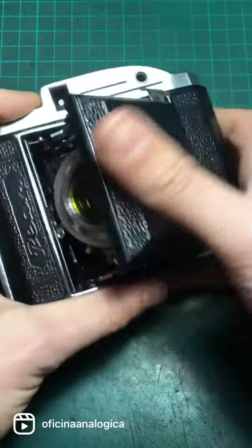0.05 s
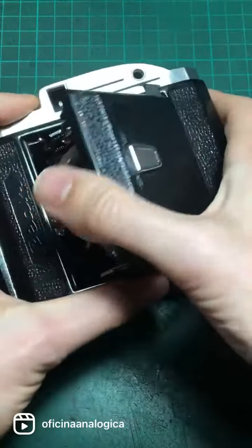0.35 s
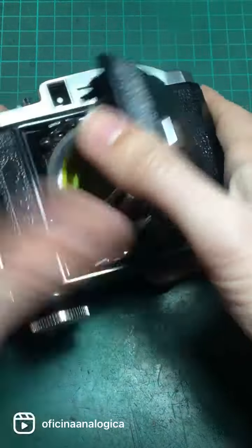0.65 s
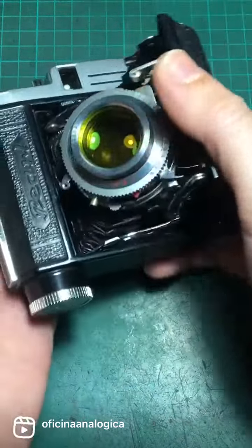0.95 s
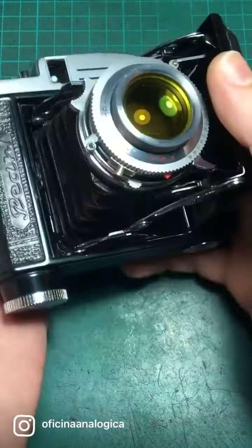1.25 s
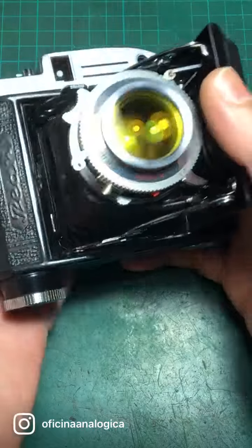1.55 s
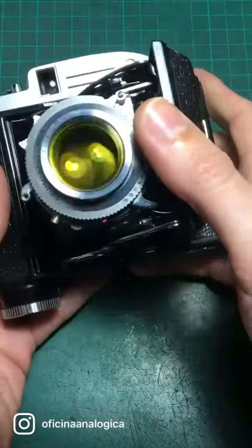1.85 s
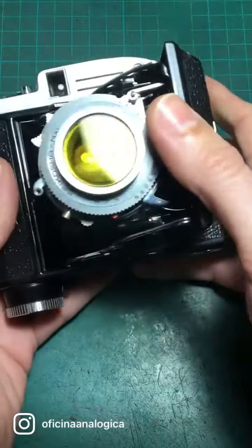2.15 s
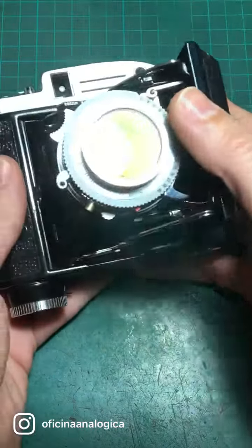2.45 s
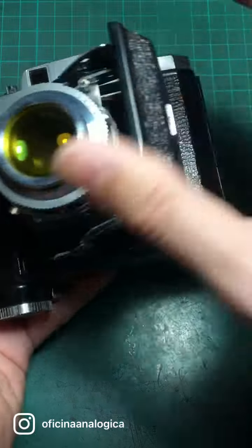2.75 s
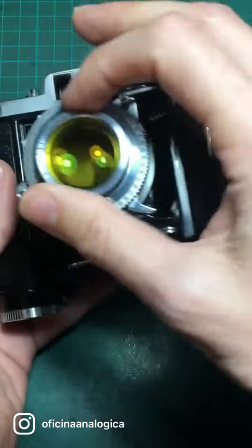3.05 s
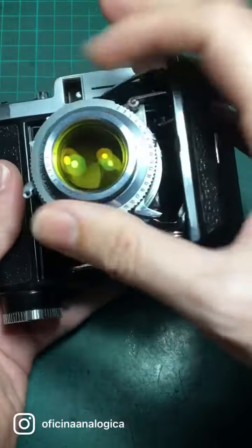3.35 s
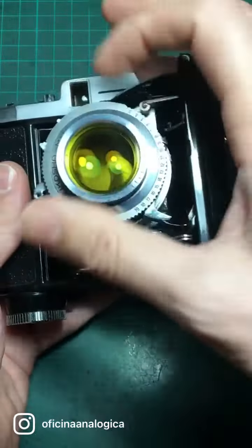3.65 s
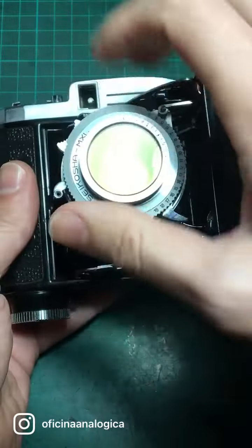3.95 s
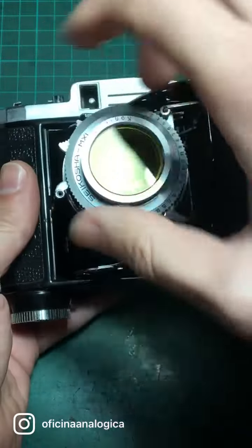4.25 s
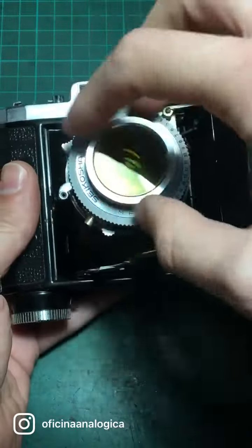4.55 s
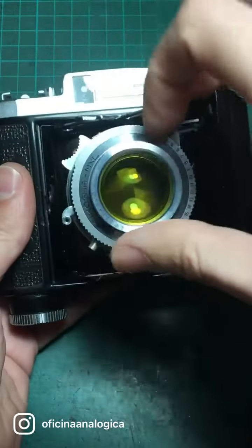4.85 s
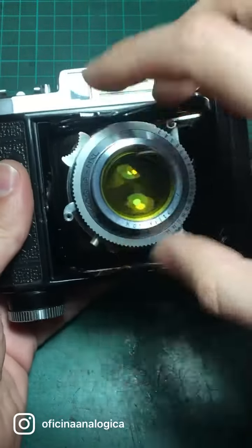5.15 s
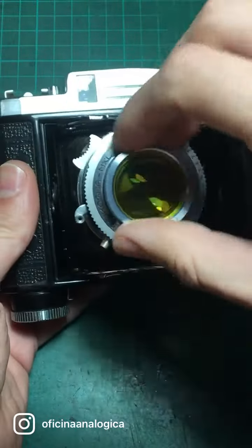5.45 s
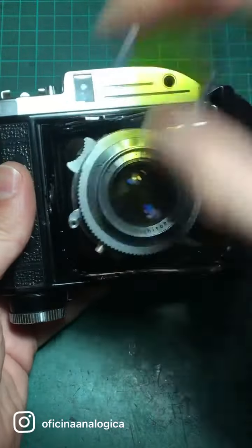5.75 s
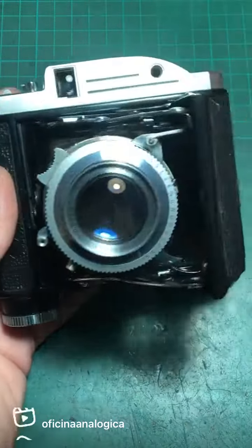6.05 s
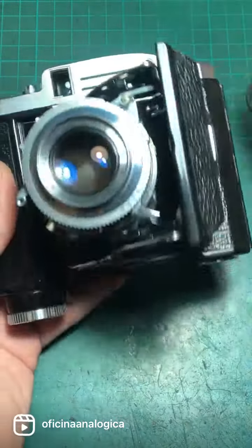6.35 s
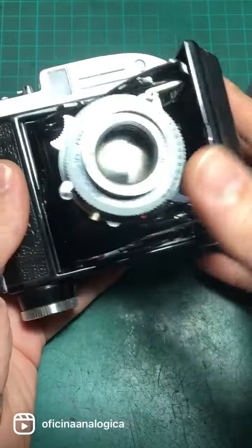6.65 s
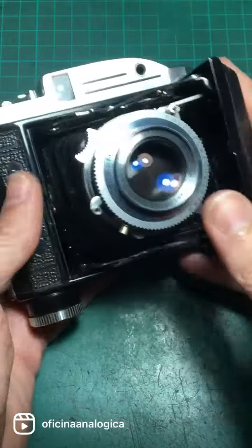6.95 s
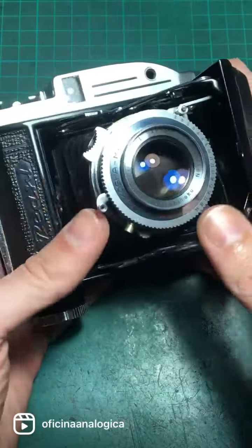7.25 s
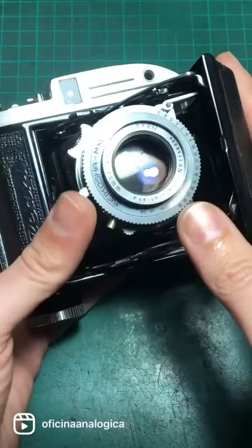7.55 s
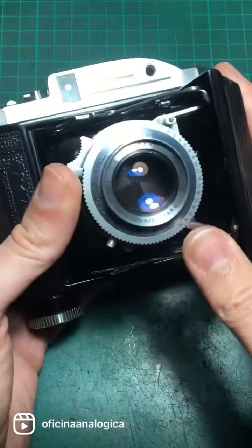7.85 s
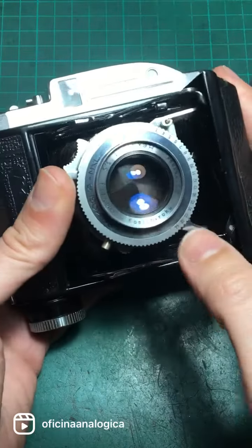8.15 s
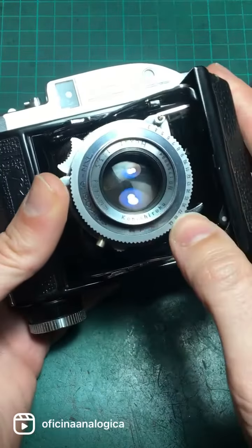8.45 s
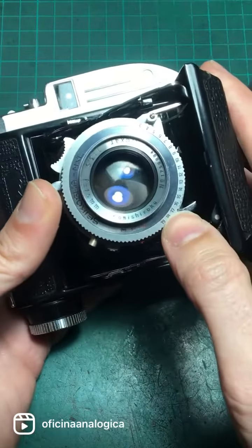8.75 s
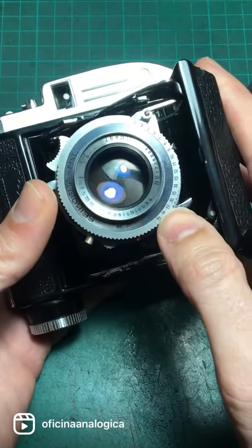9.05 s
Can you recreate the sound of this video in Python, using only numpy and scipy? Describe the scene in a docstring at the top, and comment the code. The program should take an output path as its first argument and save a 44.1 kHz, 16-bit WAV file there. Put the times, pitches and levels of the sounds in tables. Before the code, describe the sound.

Close metal clicks and one loud springy snap from a folding camera, followed by a filter scraping loose and clattering briefly on a workbench.

```python
"""A workbench in a small quiet room, where a folding camera is handled close by.
The door catch lets go, the struts snap open with a thump and their springs ring on.
A filter is unscrewed from the lens and put down, where it wobbles to rest; then shutter levers are nudged.
Knocks are short noise bursts and rubs are trains of tiny slips, each ringing through its part."""
import sys
import numpy as np
from scipy import signal
from scipy.fft import rfft, irfft
from scipy.io import wavfile

SR = 44100
rng = np.random.default_rng(int(sys.argv[2]) if len(sys.argv) > 2 else 0)


def digitize_waveform(pressure):
    """Quantize a signal to 16-bit integers and store it at the path in sys.argv[1].

    Rows of a 2-D input are taken as channels; values are limited to [-1, 1].
    """
    field = np.atleast_2d(pressure).T
    bounded = np.clip(field, -1, 1)
    quanta = np.round(bounded * 32767).astype(np.int16)
    wavfile.write(sys.argv[1], SR, quanta)


N = 401744
TAPS = 4096
CATCH_S, SNAP_S = .3833, 1.0603  # catch lets go, door hits its stop
BLOW_S = .01  # nominal blow length
STRIKE, SOFT_STRIKE = .45, .25  # clean first impact, relative to the rattle
FINGER_ECHO_GAIN = .5

# Row formats for all tables:
# Hits. Each row: time in seconds, level in dB.
# Strokes. Each row: start and end in seconds, level in dB, tilt in dB/octave, swell in dB.
# Shape, a part's broad spectrum. Each row: frequency in Hz, level in dB.
# Peaks, its resonances. Each row: centre in Hz, width in Hz, gain in dB.
LEVER_SHAPE = [(400, -32), (1500, -18), (4000, -13), (6500, -7.5), (8000, -7.5), (10000, -9.5),
               (14500, -7.5), (16000, -16)]
LEVER_PEAKS = [(6200, 200, 1.9), (8000, 1000, 8), (11700, 900, 4), (14000, 760, 2)]


def struts():
    """The struts unfold and lock in a quick run of blows."""
    # Each row: time in seconds, level in dB, tilt in dB/octave, rattle t60 in seconds.
    locks = [(1.009, -50, -3.5, 0.048), (1.038, -56, -4, .04), (1.0563, -21, 1.5, 0.031),
             (1.0597, -18, 0, 0.0097), (1.064, -20.5, 1.66, 0.025)]
    shape = [(200, -14), (310, -9.5), (400, -22), (490, -33), (650, -8), (1180, -5.5), (1600, -7.5),
             (2000, -6), (3000, -9), (4300, -9), (5400, -11), (8800, -9), (9800, -19.5), (11500, -13.5),
             (13000, -14.5), (16000, -22.5)]
    peaks = [(1200, 150, 4.6), (1520, 60, 1.8), (1850, 120, 6), (2728, 90, 9.5), (3410, 90, 11),
             (3900, 220, 5.1), (4500, 140, 7.3), (6134, 80, 5.5), (6500, 80, 3.5), (7130, 69, 4.4),
             (7364, 54, 3.5), (8860, 500, 5)]
    return blows(locks, shape, peaks, first=SOFT_STRIKE, rise_s=.00037, after_db=-22, after_t60_s=.14)


def door_thump(level_db=-9, low_hz=50, sweep_hz=370, settle_s=.0036, rise_s=.0027, t60_s=.066):
    """The door stops dead: a low knock whose pitch drops as the body takes up the blow."""
    out, t = np.zeros(N), np.arange(2 * TAPS) / SR
    cycles = np.cumsum(low_hz + sweep_hz * np.exp(-t / settle_s)) / SR
    envelope = amp(level_db - 60 * t / t60_s) * (1 - np.exp(-(t / rise_s) ** 2))
    add(out, SNAP_S, -envelope * np.sin(2 * np.pi * cycles))
    return out


def springs():
    """Thin springs and the shell ring on after the snap and the catch's release."""
    # Each row: frequency in Hz, level in dB, t60 in seconds.
    snap_modes = [(111, -47, 0.34), (210, -46, 0.46), (275.1, -43, 0.19), (315, -26.5, 0.027),
                  (942, -39.5, .9), (956, -52.5, 1.4), (1035, -53, 1.5), (1258, -47.5, 0.48),
                  (1884, -42, 0.86), (2080, -50, 0.39), (2342, -66, .8), (3554, -50, .35),
                  (3774, -61.5, .8), (4100, -51.5, .33), (5410, -74.5, 1), (5900, -71, 1.5),
                  (8619, -77, .9), (9390, -76.5, 1.2), (10480, -30, .07), (13431, -78, 1.1),
                  (14640, -28, .085)]
    catch_modes = [(1220, -64.5, 0.54), (2244, -63, 0.35), (3860, -69, 0.18), (5410, -72, .8),
                   (5852, -70, 0.93), (13431, -78, .8)]
    out, t = np.zeros(N), np.arange(2 * SR) / SR
    for jolt_s, modes in (SNAP_S, snap_modes), (CATCH_S, catch_modes):
        for hz, db, t60_s in modes:
            add(out, jolt_s, amp(db - 60 * t / t60_s) * np.sin(2 * np.pi * hz * t))
    return out


def door_catch():
    """The catch clicks and rebounds; the door drags past it."""
    hits = [(.2955, -62.5), (.3392, -41), (.3605, -43), (.3833, -36.5), (2.9368, -40)]
    strokes = [(.338, .368, -45, -6, -5)]
    shape = [(180, -24), (300, -45), (486, -3), (634, -15), (787, -6.5), (1360, -10.5), (2000, -5.5),
             (2610, -3.5), (4990, -4.5), (6850, 0), (8940, -12), (13100, -6), (16000, -18)]
    peaks = [(796, 62, 10.5), (2250, 500, 6), (3740, 280, 5), (4650, 170, 6), (6200, 280, 2),
             (6900, 250, 6), (13400, 500, -1)]
    rows = by_force(hits, tilt_db_oct=0, harden=.27, t60_s=.024, seat=.1)
    clicks = blows(rebounding(rows, delay_s=.004, weaker_db=10.5), shape, peaks,
                   after_db=-17, after_t60_s=.099, onset_db=-10, onset_t60_s=.012)
    return clicks + rubs(strokes, shape, peaks, slips_per_s=810, spread_db=2, hiss=.53)


def filter_knocks():
    """The filter knocks in its thread as it is gripped and let go."""
    hits = [(3.224, -65), (3.251, -63), (3.3495, -33.5), (3.3855, -52), (3.6315, -33.5), (3.669, -45.5),
            (3.7505, -43.5), (3.972, -57.5), (4.078, -62.5), (4.097, -58.5), (4.471, -62.5), (4.793, -62),
            (4.8312, -31.5), (4.983, -54.5), (5.0056, -50), (5.2922, -54), (5.462, -58.5)]
    shape = [(240, -35), (600, -22.5), (1300, -12), (2400, -7), (3100, -12), (4200, -7.5), (5500, -12.5),
             (7000, -8), (10100, -10.5), (11500, -7.5), (13000, -12.5), (15000, -15), (16000, -30)]
    peaks = [(1270, 440, 3.3), (1940, 42, 6.4), (2414, 180, 6.7), (3480, 400, 7), (4500, 430, 5.4),
             (6430, 620, 5.6), (8360, 540, 4.8), (11240, 280, 11.2), (11880, 520, 11.5)]
    rows = by_force(hits, tilt_db_oct=-3.5, harden=.23, t60_s=.024, seat=.55)
    return blows(rebounding(rows, delay_s=.0038, weaker_db=12), shape, peaks,
                 rise_s=.00058, after_db=-18, after_t60_s=.041, onset_db=-6, onset_t60_s=.006)


def filter_turns(grit_db=-7.5):
    """The turning filter rubs in its thread and cracks grains of grit."""
    strokes = [(3.12, 3.28, -72.5, 0, -1), (3.36, 3.51, -63.5, 1.5, -3), (3.636, 3.7, -49, 0.4, -3),
               (3.67, 3.765, -62, 0.5, -7), (3.985, 4.13, -67, 1, -1), (4.375, 4.53, -62, 0, -7),
               (4.835, 4.89, -62.5, -5.5, -18), (4.91, 5.0, -63, 1, 21), (5.31, 5.46, -70.5, -2.5, 6)]
    shape = [(300, -20), (1000, -7.5), (2000, -4.5), (3000, -6), (4400, 2), (5100, -9), (8000, -5),
             (9400, -7.5), (10500, -20), (11700, -4), (13200, -23), (16000, -22)]
    peaks = [(1920, 190, 4), (2440, 230, 3.3), (4280, 830, -2.5), (11980, 800, 8)]
    grit_shape = [(400, -23), (1300, 2), (2400, -3), (4400, 3), (5500, -11), (8000, -8), (16000, -20)]
    friction = rubs(strokes, shape, peaks, slips_per_s=800, spread_db=1, hiss=.59, echo=FINGER_ECHO_GAIN)
    grit = rubs(strokes, grit_shape, [], slips_per_s=90, spread_db=3, hiss=.15)
    return friction + amp(grit_db) * grit


def filter_falls(start_s=6.181, first_gap_s=.0467, speed_kept=.815):
    """Hits of the filter rocking on its uneven rim: each bounce loses speed, so the gaps shrink."""
    falls_db = [-39, -40.5, -43.5, -42, -44.5, -50.5, -51.5]  # one level per fall
    speed = speed_kept ** np.arange(len(falls_db))
    return list(zip(start_s + first_gap_s * (np.cumsum(speed) - speed), falls_db))


def filter_wobble(falls):
    """The rim touches the bench, then clacks at each fall."""
    touch_hits = [(6.0728, -49.5), (6.159, -51)]
    shape = [(240, -49), (400, -8), (496, -25), (579, -16), (1030, -7.5), (1220, -2.5), (1790, -7),
             (3530, -11.5), (4880, -26), (7170, -16.5), (10200, -30), (11200, -22), (16000, -37)]
    peaks = [(1223, 38, 4.9), (2100, 500, 2.4), (3540, 400, 5), (5540, 600, 7.4), (6800, 260, 3.2)]
    rows = by_force(touch_hits + falls, tilt_db_oct=-4, harden=.57, t60_s=.051, seat=.35)
    return blows(rows, shape, peaks, first=SOFT_STRIKE, rise_s=.00057,
                 after_db=-27, after_t60_s=.071, onset_db=-7, onset_t60_s=.0081)


def bumps(falls, fall_gain_db=-3.5):
    """Dull bumps of the door, and of the hand and rocking filter on the bench."""
    hits = [(.345, -55.5), (6.038, -44), (6.046, -44), (6.053, -44.5)]
    shape = [(40, -1.5), (110, -7), (190, -5), (280, 3.5), (420, -23), (600, -12), (1000, -24), (2500, -34),
             (8000, -45.5)]
    thuds = hits + [(s, db + fall_gain_db) for s, db in falls]
    rows = by_force(thuds, tilt_db_oct=0, harden=0, t60_s=.03, seat=0)
    return blows(rows, shape, [], rise_s=.00083, after_db=-15.5, after_t60_s=.59)


def lever_ticks():
    """Nudged levers and linkages tick."""
    hits = [(.872, -67.5), (1.639, -66.5), (1.66, -67), (4.64, -69), (5.6387, -68.5), (6.6389, -67),
            (6.771, -67), (7.5508, -60), (7.6247, -62), (7.6455, -53), (7.6535, -44.5), (8.097, -63),
            (8.19, -69.5), (8.514, -71.5), (8.6419, -67)]
    rows = by_force(hits, tilt_db_oct=0, harden=.41, t60_s=.028, seat=.1)
    return blows(rows, LEVER_SHAPE, LEVER_PEAKS, after_db=-34, after_t60_s=.04)


def slides():
    """Door, struts and levers rub as they slide, and skin brushes the body once."""
    strokes = [(.45, .6, -74.5, -5, 14), (.6, .69, -68, -2.5, -19), (.81, .92, -70, -5, 1.5),
               (.91, 1.03, -68, -4.5, -1), (1.025, 1.062, -54.5, -4.5, 9), (2.41, 2.545, -68.5, -4.5, 10),
               (8.08, 8.2, -77.5, -3.5, -16)]
    shape = [(300, -15), (900, -1.5), (2000, -2), (4500, -1.5), (7000, -3.5), (10000, -7), (14500, -6),
             (16000, -16)]
    return rubs(strokes, shape, [], slips_per_s=940, spread_db=4.5, hiss=1, echo=FINGER_ECHO_GAIN)


def shutter_ring():
    """The ring rasps as it is dragged round."""
    strokes = [(7.53, 7.68, -66.5, -1, -1)]
    return rubs(strokes, LEVER_SHAPE, LEVER_PEAKS, slips_per_s=350, spread_db=-3, hiss=.98)


def hands():
    """Fingers tap softly on body and levers; skin rubs as the grip shifts."""
    hits = [(2.693, -61), (3.023, -59), (6.86, -54.5), (6.965, -59.5), (6.998, -58.5), (8.097, -69)]
    tap_shape = [(200, -25), (600, -19), (1150, -2.5), (1450, -16.5), (2100, -4), (4000, -12.5),
                 (9000, -19), (16000, -61)]
    tap_peaks = [(830, 90, 2.2), (1180.3, 250, 10.5), (1744, 130, 16)]
    strokes = [(1.58, 1.72, -73, -.5, -10), (2.45, 2.7, -70.5, 5, -3), (3.25, 4.45, -69.5, -4, -1),
               (8.5, 9.05, -70.5, -10, 1)]
    skin_shape = [(40, -16.5), (110, 6), (190, -2.5), (280, -1), (450, -23.5), (1000, -26.5), (8000, -51)]
    rows = by_force(hits, tilt_db_oct=-6, harden=.11, t60_s=.016, seat=.6)
    taps = blows(rows, tap_shape, tap_peaks, rise_s=.00096, after_db=-35, after_t60_s=.06)
    return taps + rubs(strokes, skin_shape, [], slips_per_s=100, spread_db=.5, hiss=.77)


def room(x, rise_s=.004):
    """A short diffuse tail, each band dying at its own speed."""
    shape = [(100, -12.5), (500, 0), (1300, 2.5), (4000, -2), (8000, -3.5), (15000, -5)]
    decay = [(150, 0.1), (1200, 0.33), (4000, 0.37), (8000, 0.19), (15000, 0.13)]  # Each row: frequency in Hz, t60 in seconds.
    hz, t, noise = signal.stft(rng.standard_normal(SR), SR, nperseg=256)
    band_db = read(shape, hz)[:, None] - 60 * t / read(decay, hz)[:, None]
    tail = signal.istft(noise * amp(band_db), SR, nperseg=256)[1]
    onset = 1 - np.exp(-(np.arange(len(tail)) / SR / rise_s) ** 2)
    return signal.fftconvolve(x, unit(tail * onset))[:N]


def room_tone(level_db=-60.5):
    """Steady low rumble with a faint hum and hiss."""
    shape = [(12, -37), (20, -6.5), (60, 0.5), (91, -15), (116, -14.5), (270, -19), (422, -26.5),
             (485, -27.5), (1710, -36.5), (2080, -33), (2820, -40.5), (4940, -41.5), (11400, -45),
             (13900, -43.5), (16000, -48)]
    peaks = [(107.4, 14, 10), (2100, 240, 3)]
    hz = np.fft.rfftfreq(N, 1 / SR)
    noise = irfft(rfft(rng.standard_normal(N)) * amp(colour(shape, peaks, hz)), N)
    return amp(level_db) * np.sqrt(N) * unit(noise)


def by_force(hits, tilt_db_oct, harden, t60_s, seat, medium_db=-50):
    """Adds tilt and rattle t60 to hits: a harder blow is brighter and seats the part sooner."""
    return [(s, db, tilt_db_oct + harden * (db - medium_db), t60_s * amp(-seat * (db - medium_db)))
            for s, db in hits]


def rebounding(rows, delay_s, weaker_db):
    """A springy part strikes again, a moment later and weaker."""
    return rows + [(s + delay_s, db - weaker_db, tilt, t60_s) for s, db, tilt, t60_s in rows]


def blows(rows, shape, peaks, after_db, after_t60_s,
          first=STRIKE, rise_s=.0004, onset_db=-13, onset_t60_s=.0065):
    """Each knock swells in briefly, strikes and rattles; all of it rings through the struck part."""
    lead = TAPS // 8
    out, t = np.zeros(N), np.arange(-lead, TAPS) / SR
    since_s = np.maximum(t, 0)
    soft_onset = amp(onset_db - 60 * abs(t) / onset_t60_s)
    after_rattle = amp(after_db - 60 * since_s / after_t60_s)
    for s, db, tilt_db_oct, t60_s in rows:
        rattle = amp(-60 * since_s / max(t60_s, .002))
        force = (rattle + after_rattle) * (1 - np.exp(-since_s / rise_s)) + soft_onset
        contact = unit(rng.standard_normal(len(t)) * force)
        contact[lead + round(rise_s * SR)] += first
        ring = signal.fftconvolve(contact, response(shape, peaks, tilt_db_oct))
        add(out, s - lead / SR, amp(db) * np.sqrt(BLOW_S * SR) * unit(ring))
    return out


def rubs(strokes, shape, peaks, slips_per_s, spread_db, hiss, echo=0, grip_db=3, grip_hz=70):
    """Tiny uneven slips over a smooth hiss excite the sliding part; the grip tightens and eases."""
    out = np.zeros(N)
    slipping = rng.random(N) < slips_per_s / SR
    slips = slipping * amp(spread_db * np.minimum(rng.exponential(1, N), 3))
    drive = unit(slips * rng.choice([-1, 1], N)) + hiss * unit(rng.standard_normal(N))
    knots = np.arange(0, N, SR // grip_hz)
    drive *= amp(grip_db * np.interp(np.arange(N), knots, rng.standard_normal(len(knots))))
    for start_s, end_s, db, tilt_db_oct, swell_db in strokes:
        stroke = drive[round(start_s * SR):round(max(end_s, start_s + BLOW_S) * SR)]
        at, along = np.arange(len(stroke)), np.linspace(0, 1, len(stroke))
        # The echo off the moving fingers comes ever later, so its comb slides down.
        delay_samples = SR * rng.uniform(.0003, .0004) * (1 + .55 * along)
        stroke = stroke + echo * np.interp(at - delay_samples, at, stroke)
        stroke *= np.sin(np.pi * along) * amp(swell_db * along)
        ring = signal.fftconvolve(stroke, response(shape, peaks, tilt_db_oct))
        add(out, start_s, amp(db) * np.sqrt(len(stroke)) * unit(ring))
    return out


def response(shape, peaks, tilt_db_oct, knee_hz=900):
    """Minimum-phase impulse response of a part, tilted above the knee."""
    hz = abs(np.fft.fftfreq(TAPS, 1 / SR))
    db = colour(shape, peaks, hz) + tilt_db_oct * np.log2(np.maximum(hz, knee_hz) / knee_hz)
    log_gain = np.log(amp(np.maximum(db, db.max() - 80)))
    return np.fft.ifft(np.exp(np.conj(signal.hilbert(log_gain)))).real


def colour(shape, peaks, hz):
    """Level in dB of a broad spectrum with resonances on top."""
    return read(shape, hz) + sum(db / (1 + (2 * (hz - f) / width) ** 2) for f, width, db in peaks)


def read(points, hz):
    """Interpolates a table over log frequency."""
    f, value = np.transpose(points)
    return np.interp(np.log(hz + 1), np.log(f + 1), value)


def amp(db):
    """Decibels to gain."""
    return 10 ** (np.asarray(db) / 20)


def unit(x):
    """Scales to energy 1."""
    return x / np.sqrt(np.sum(x ** 2) + 1e-20)


def add(mix, start_s, sound):
    """Mixes a sound in place."""
    part = mix[round(start_s * SR):][:len(sound)]
    part += sound[:len(part)]


def scene():
    """Camera parts, bench and hands in mono; all but the springs excite the room."""
    door = door_catch() + struts() + door_thump()
    lens = filter_knocks() + lever_ticks() + filter_turns() + slides() + shutter_ring()
    falls = filter_falls()
    bench = filter_wobble(falls) + bumps(falls) + hands()
    wet = room(amp(-17.5) * door + amp(-22.5) * lens + amp(-16.5) * bench)
    return (door + springs() + lens + bench + wet + room_tone())[None]


def record(dry, low_hz=26, high_hz=16100):
    """Sheds the deepest rumble and the highest treble."""
    thin = signal.sosfilt(signal.butter(2, low_hz, "high", fs=SR, output="sos"), dry)
    lowpass = signal.firwin(255, high_hz, window=("kaiser", 8), fs=SR)
    return signal.oaconvolve(thin, lowpass[None], "same", axes=1)


dry = scene()
out = record(dry)
digitize_waveform(out)
```